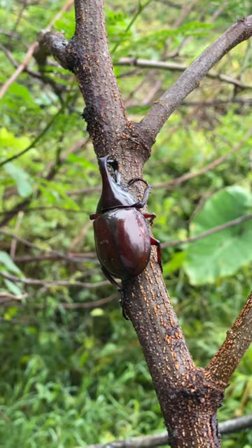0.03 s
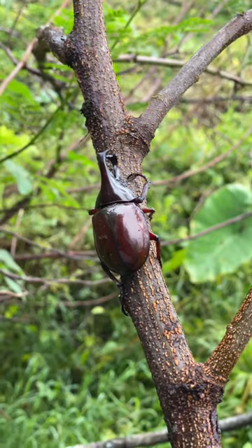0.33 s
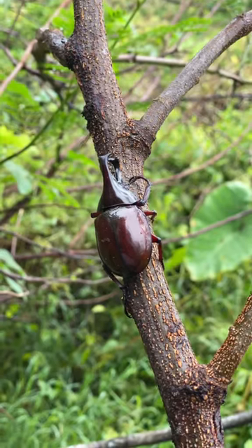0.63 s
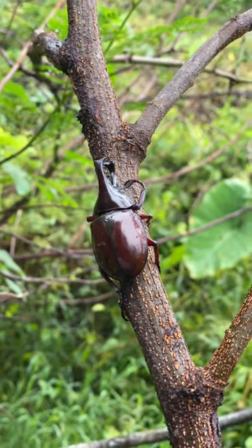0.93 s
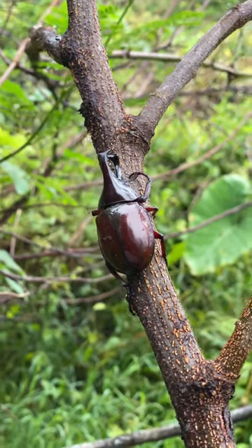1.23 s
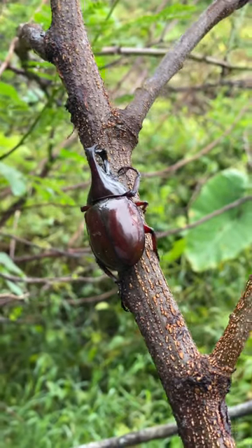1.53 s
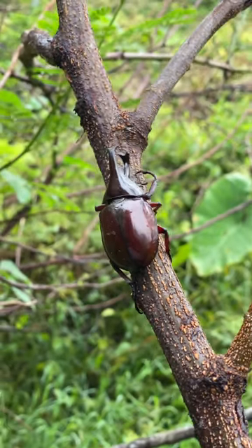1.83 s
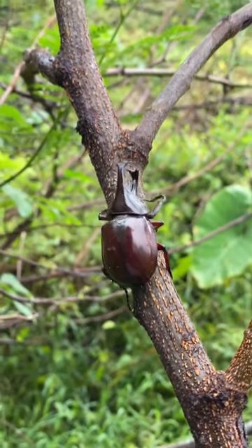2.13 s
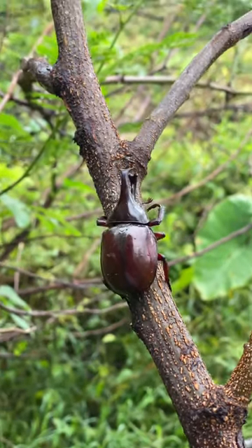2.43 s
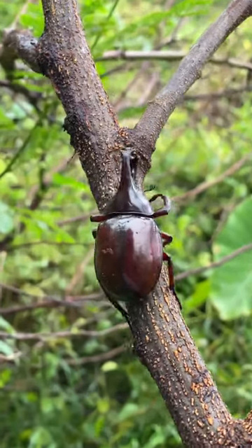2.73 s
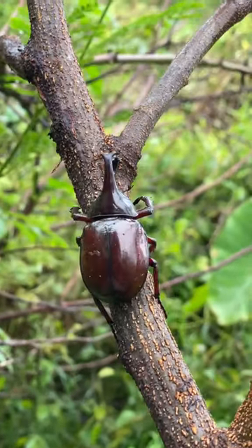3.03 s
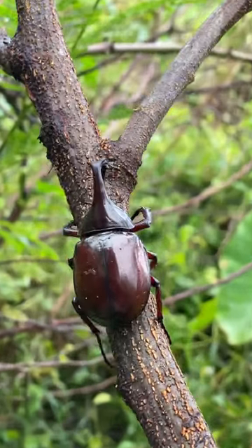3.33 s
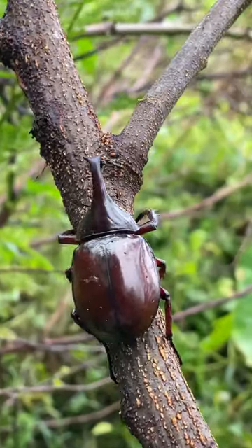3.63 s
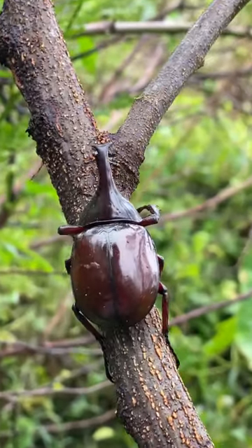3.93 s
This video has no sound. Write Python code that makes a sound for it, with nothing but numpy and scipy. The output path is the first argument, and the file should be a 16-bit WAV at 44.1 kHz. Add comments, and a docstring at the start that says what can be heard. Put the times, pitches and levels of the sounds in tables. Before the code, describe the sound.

Light wind hisses through foliage while insects buzz faintly and fingers rub the microphone.

```python
"""A steady, distant rumble and a soft wash of breeze in leaves: a quiet thicket, heard through the
two microphone ports of a hand-held camera. Far off, a thin insect chorus ebbs and swells, with one
nearer chirp. A few faint high ticks sound. Right at the microphone, fingers knock lightly on the
camera body, then slide on it with small low slips, the rubbing mostly at the left port."""
import sys
import numpy as np
from scipy import signal
from scipy.fft import rfft, irfft
from scipy.io import wavfile
from scipy.ndimage import uniform_filter1d

SR = 44100
rng = np.random.default_rng(int(sys.argv[2]) if len(sys.argv) > 2 else 0)


def materialize(psi):
    """Save the field psi as 16-bit PCM at rate SR to the path in sys.argv[1].

    A 1-D psi becomes a single channel; in a 2-D psi each row is a channel.
    """
    bounded = np.clip(np.atleast_2d(psi).T, -1, 1)
    quanta = np.round(bounded * 32767).astype(np.int16)
    wavfile.write(sys.argv[1], SR, quanta)


N = 176400
TIME, FREQS = np.arange(N) / SR, np.fft.rfftfreq(N, 1 / SR)


def amp(db):
    """Decibels to gain."""
    return 10 ** (np.asarray(db) / 20)

def unit_rms(x):
    """Scales to rms 1."""
    return x / np.sqrt(np.mean(x ** 2) + 1e-20)

def curve(points):
    """Spreads rows of (f/Hz, value) over FREQS on a log axis."""
    hz, value = np.transpose(points)
    return np.interp(np.log(FREQS + 1), np.log(hz + 1), value)

def fader(points):
    """Gain over time from rows of (t/s, level/dB)."""
    return amp(np.interp(TIME, *np.transpose(points)))

def add(mix, start, sound):
    """Mixes in a stereo sound at start seconds."""
    part = mix[:, round(start * SR):][:, :sound.shape[1]]
    part += sound[:, :part.shape[1]]

def tinted(x, points):
    """Filters one channel by rows of (f/Hz, gain/dB)."""
    return irfft(rfft(x) * amp(curve(points)), N)

def drift(rate):
    """Smooth random wander of rms 1, up to about rate changes a second."""
    lowpass = (FREQS > 0) * np.exp(-(FREQS / rate) ** 2)
    return unit_rms(irfft(rfft(rng.standard_normal(N)) * lowpass, N))

def wash(colour_db, likeness, left_lead, patchy_db=0, waver_db=0):
    """Coloured noise of rms 1 at two ports, with drifting patches and a shared waver in level."""
    frames = dict(nperseg=512, noverlap=384)
    cells = signal.stft(rng.standard_normal((2, N)), **frames)[2]
    patches = uniform_filter1d(rng.standard_normal(cells.shape[1:]), size=7, axis=0)
    patches = unit_rms(uniform_filter1d(patches, size=14, axis=1))
    left, other = rfft(signal.istft(cells * amp(patchy_db * patches), **frames)[1][:, :N])
    right = (likeness * left + np.sqrt(1 - likeness ** 2) * other) * np.exp(-1j * left_lead)
    ports = irfft(np.array([left, right]) * amp(colour_db), N)
    return unit_rms(ports * amp(waver_db * drift(6.8)))


# Rumble in the distance: f/Hz, relative level/dB
RUMBLE_COLOUR = [(15, -35), (28, -32), (40, -19), (52, -7), (75, -5.5), (104, 0.5), (150, -3.5), (200, -4),
                 (300, -7), (450, -13.5), (700, -45), (1500, -83)]
# Its level over time at the microphone: t/s, level/dB
RUMBLE_LEVELS = [(0, -41.5), (.45, -40), (.9, -42), (1.1, -41), (1.3, -40.5), (1.55, -41.5), (1.82, -39.5),
                 (1.95, -41), (2.3, -39.5), (2.55, -40.5), (3, -41), (3.2, -39), (3.48, -43), (3.7, -41),
                 (4, -40)]

def rumble():
    """A steady low rumble whose level wavers slightly at random, almost the same at both ports."""
    noise = wash(curve(RUMBLE_COLOUR), likeness=.98, left_lead=0, patchy_db=1.2, waver_db=.8)
    return fader(RUMBLE_LEVELS) * noise


# Leaves all around the microphone: f/Hz, relative level/dB
LEAF_COLOUR = [(60, -20), (150, -4), (250, 2.8), (380, 2.8), (600, .6), (800, -1.3), (1000, -2.5),
               (1300, -3), (1700, -3.6), (2100, -4.7), (2600, -7.4), (3200, -9), (4000, -11.4),
               (5200, -12.7), (6400, -14.6), (7200, -16.2), (9200, -17.3), (11000, -20), (12200, -24.5),
               (13000, -37), (15600, -55)]
# Their lift at the left port: f/Hz, gain/dB
LEAF_LEFT_LIFT = [(230, 0), (450, 4), (650, 6.2), (870, 9), (1250, 7.2), (1500, 4), (1800, 1), (2100, 0)]
# How alike they are at the two ports: f/Hz, likeness/0-1
PORT_LIKENESS = [(200, .97), (350, .88), (450, .72), (600, .56), (850, .5), (1030, .3), (1200, .55),
                 (1450, .8), (1750, .91), (3600, .93), (4600, .82), (4900, .99), (5100, .82), (5500, .92),
                 (7000, .76), (10800, .76), (11800, .99), (12300, 1)]
# How far the left port leads: f/Hz, phase/rad
PORT_LEAD = [(150, 0), (330, .45), (450, .85), (600, 1.3), (900, 1.6), (1100, .85), (1400, .47),
             (2000, .42), (2580, 1.2), (3530, .2), (4050, .3), (4650, 1.3), (4900, 3.14), (5120, 5.7),
             (6200, 6.7), (7200, 7.5), (10200, 8.6), (11800, 9.425)]

def leaves():
    """Breeze through foliage makes an even hiss, with a hollow-sounding middle at the left port."""
    left, right = wash(curve(LEAF_COLOUR), curve(PORT_LIKENESS), curve(PORT_LEAD),
                       patchy_db=.82, waver_db=.22)
    return amp(-39.5) * unit_rms(np.array([tinted(left, LEAF_LEFT_LIFT), right]))


# Insects far off in the thicket: t/s, level/dB
CHORUS_SWELLS = [(0, -55.5), (.4, -57.5), (.7, -57.5), (1, -55.5), (1.4, -60), (2.3, -58.5), (3.15, -57),
                 (3.35, -57.5), (3.8, -55.5), (4, -54)]
INSECT_LEAD_RAD = 1.76

def insects(centre_hz=8000, skirt_hz=800, buzz_hz=106, throb_hz=6.9):
    """Many far insects blur into one high resonance that buzzes and throbs."""
    resonance_db = -40 * np.log10(1 + ((FREQS - centre_hz) / skirt_hz) ** 2)
    band = wash(resonance_db, likeness=.78, left_lead=INSECT_LEAD_RAD, patchy_db=.5, waver_db=1)
    buzz = 1 + .2 * np.sin(2 * np.pi * np.cumsum(buzz_hz * (1 + .034 * drift(9.5))) / SR)
    throb = amp(.5 * np.sin(2 * np.pi * np.cumsum(throb_hz * (1 + .093 * drift(1.5))) / SR))
    return unit_rms(band * buzz * throb) * fader(CHORUS_SWELLS)


# One chirp, nearer than the chorus: t/s, length/s, starting f/Hz
NEAR_CHIRP = (.055, .125, 9000)

def chirp(length, hz, sag_hz_per_s=1800, wobble_hz=220):
    """An insect's thin, wobbling note sags a little."""
    t = np.arange(0, length, 1 / SR)
    pitch = hz - sag_hz_per_s * t + wobble_hz * drift(200)[:len(t)]
    phase = 2 * np.pi * np.cumsum(pitch) / SR
    arch = np.sqrt(abs(np.sin(np.pi * t / length)))
    level = amp(-56 + 3 * drift(80)[:len(t)]) * arch
    return level * np.sin([phase, phase - INSECT_LEAD_RAD])


# Tiny, faint high ticks: t/s, level before smoothing/dB, decay/s
FAINT_TICKS = [(.871, -44.5, 0.007), (1.0025, -47, .002), (3.44, -48, .003)]
# Their treble: f/Hz, relative level/dB
TICK_TREBLE = [(3000, -40), (7500, -15), (8500, 0), (10000, -8), (12000, -18), (16000, -40)]

def ticks():
    """Brief bright snaps of fast-decaying noise."""
    level = sum(amp(db) * (TIME >= start) * np.exp(-abs(TIME - start) / decay)
                for start, db, decay in FAINT_TICKS)
    noise = wash(curve(TICK_TREBLE), curve(PORT_LIKENESS), curve(PORT_LEAD))
    return uniform_filter1d(level, size=48) * noise


# Fingers sliding right beside the microphone: t/s, level/dB
RUB_STROKES = [(1.33, -77), (1.39, -38.5), (1.52, -39.5), (1.7, -42), (1.88, -43), (2.03, -40.5),
               (2.45, -42), (2.73, -37), (2.92, -44), (3.25, -41), (3.45, -42.5), (4, -39)]
# Their friction at the left port: f/Hz, relative level/dB
FRICTION_COLOUR = [(60, -24), (160, -13), (280, -7), (420, -1), (580, 2.5), (700, -.5), (850, -8),
                   (1100, -9.5), (1400, -15), (2200, -40), (5000, -100)]
# The right port against the left: f/Hz, gain/dB
RUB_RIGHT_CUT = [(200, -2), (550, -3.5), (750, -7), (900, -15), (1300, -24)]
RUB_LEAD_RAD = 3.09

def rub():
    """Skin slides on the camera body: a hollow, grainy murmur, duller at the right port."""
    left, right = wash(curve(FRICTION_COLOUR), likeness=.92, left_lead=RUB_LEAD_RAD,
                       patchy_db=1.2, waver_db=1.4)
    return np.array([left, tinted(right, RUB_RIGHT_CUT)]) * fader(RUB_STROKES)


# Slips of a finger beside the microphone: t/s, level before roughness/dB
FINGER_SLIPS = [(1.42, -37), (1.543, -39), (1.596, -39), (1.787, -43), (2.053, -43), (2.162, -41),
                (2.203, -44), (2.268, -43), (2.304, -42), (2.378, -41), (2.757, -46), (2.85, -47),
                (2.887, -44), (2.973, -43), (3.005, -43), (3.032, -44)]

def slip(db, length=.026, from_hz=562, to_hz=120, rough_db=3):
    """The skin sticks and lets go: a short, rough scuff that falls in pitch."""
    t = np.arange(0, length, 1 / SR)
    detune = np.exp(.15 * rng.standard_normal())
    pitch = detune * from_hz * (to_hz / from_hz) ** (t / length)
    phase = 2 * np.pi * (np.cumsum(pitch) / SR + rng.random())
    level = amp(db + rough_db * drift(200)[:len(t)]) * np.sin(np.pi * t / length)
    return level * np.sin([phase + RUB_LEAD_RAD, phase])


# Knocks on the body that holds the microphone: t/s, left peak level/dB, starting f/Hz, right gain/dB
FINGER_KNOCKS = [(.086, -31, 477, 6.5), (.1615, -32, 420, 2), (1.0038, -24, 940, 2.5),
                 (1.3975, -31.5, 516, 10.5), (1.4322, -27, 480, 1), (1.521, -25, 645, -8),
                 (1.5998, -29, 640, 1), (2.731, -24, 665, -6), (3.172, -28, 740, -2),
                 (3.1903, -25, 1000, -1), (3.495, -33, 990, 4), (3.5675, -29, 900, -4),
                 (3.7098, -28, 1100, 0)]

def knock(db, hz, right_db, rise_s=.0008, decay_cycles=1.6, pitch_halved_s=.015, lead_rad=2.72):
    """A soft fingertip bumps the body: a few damped, sagging cycles, nearly opposite at the ports."""
    t = np.arange(0, .03, 1 / SR)
    phase = 2 * np.pi * np.cumsum(hz / (1 + t / pitch_halved_s)) / SR
    level = (1 - np.exp(-(t / rise_s) ** 2)) * np.exp(-hz * t / decay_cycles)
    port_gains = amp([[db], [db + right_db]])
    return level / level.max() * port_gains * np.sin([phase + lead_rad, phase])


def scene():
    """The thicket behind, the hand on the camera in front."""
    mix = rumble() + leaves() + insects() + rub() + ticks()
    for source, rows in (chirp, [NEAR_CHIRP]), (knock, FINGER_KNOCKS), (slip, FINGER_SLIPS):
        for start, *settings in rows:
            add(mix, start, source(*settings))
    return mix

def record(dry, open_s=.0342, edge_hz=15750):
    """The microphone opens after a moment and cuts the highest treble."""
    opened = dry * np.clip((TIME - open_s) / .0022, 0, 1)
    lowpass = signal.firwin(511, edge_hz, window=("kaiser", 9), fs=SR)
    return signal.oaconvolve(opened, lowpass[None], "same")


dry = scene()
out = record(dry)
materialize(out)
```